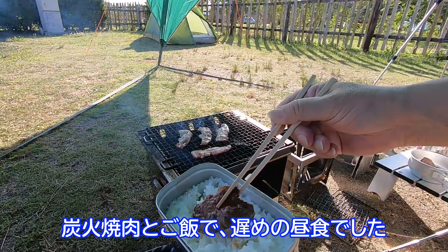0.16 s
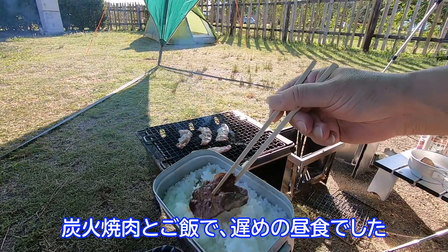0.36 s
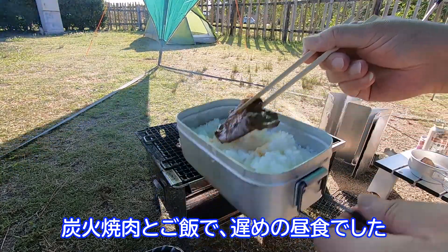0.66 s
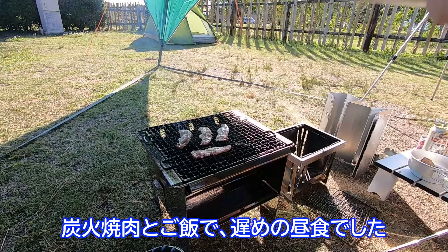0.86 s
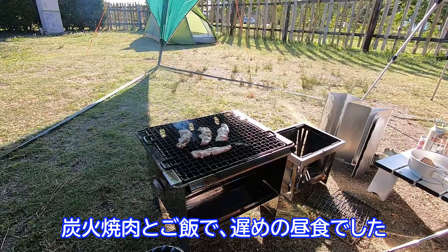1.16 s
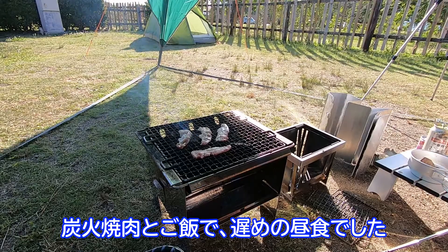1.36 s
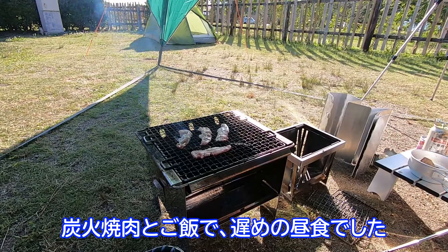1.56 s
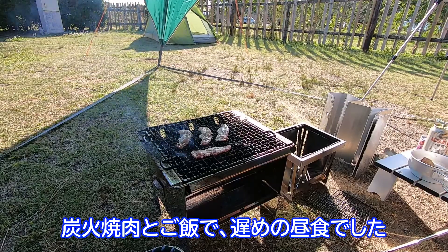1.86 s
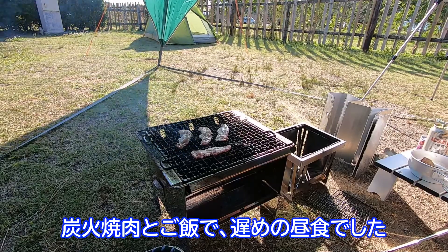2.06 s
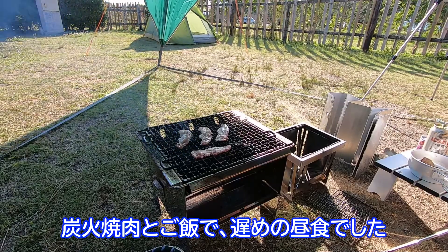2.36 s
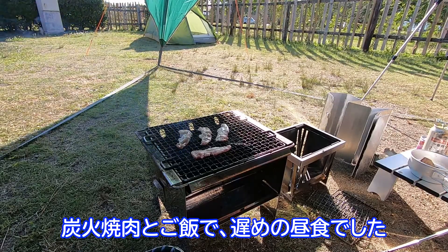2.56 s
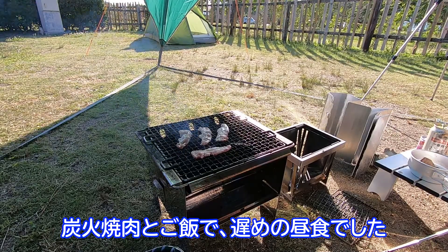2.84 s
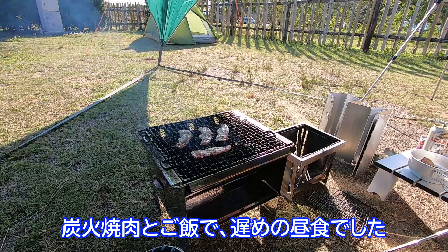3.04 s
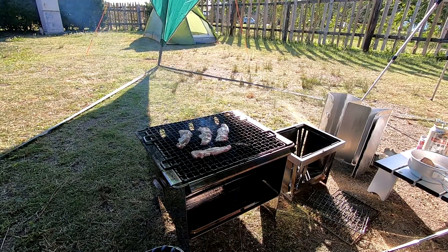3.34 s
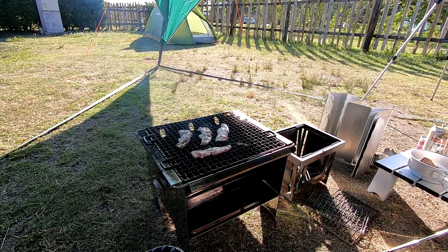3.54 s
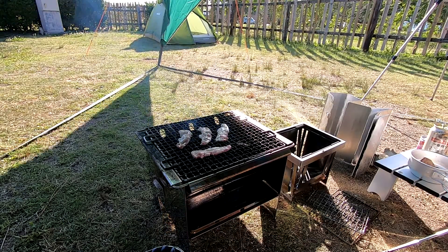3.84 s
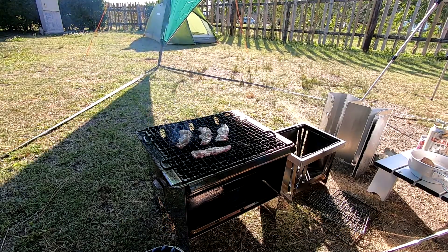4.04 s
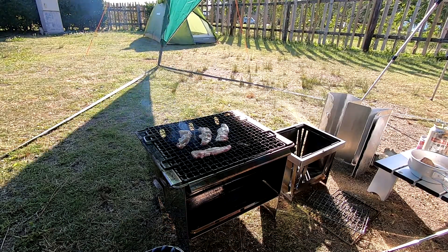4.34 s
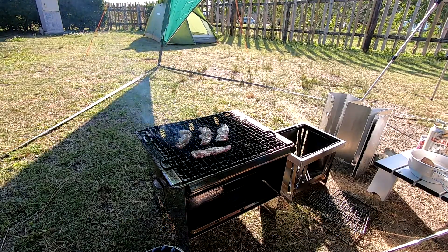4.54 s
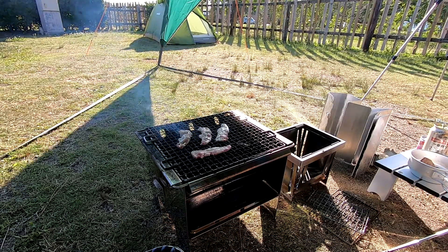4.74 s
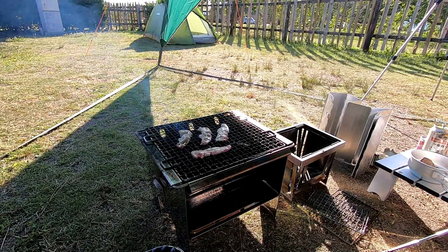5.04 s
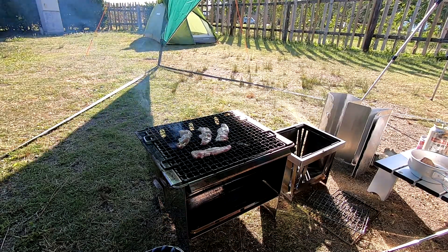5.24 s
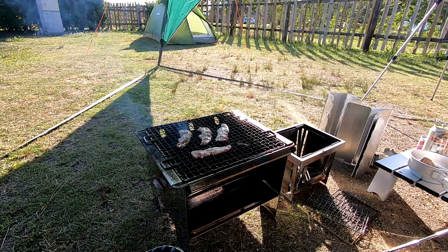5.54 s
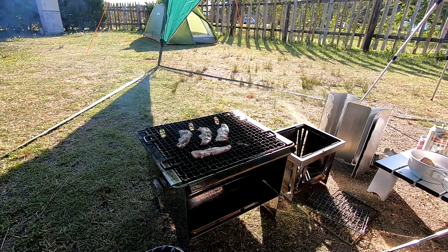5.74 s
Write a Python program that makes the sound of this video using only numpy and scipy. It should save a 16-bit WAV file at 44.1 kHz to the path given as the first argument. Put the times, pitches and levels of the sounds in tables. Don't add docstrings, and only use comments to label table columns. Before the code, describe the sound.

A bright, fine fat sizzle starts fairly strong, dotted with snaps and muted metal knocks, then eases into sparse ticking. A far engine hums low and swells around two and three seconds. Pops bunch together before four seconds; the loudest crack comes just after, followed by livelier spitting. Heard close in stereo outdoors, with short tinny grill echoes, gentle hiss, low rumble and barely noticeable wind.

```python
import sys
import numpy as np
from scipy import signal
from scipy.fft import rfft, irfft
from scipy.io import wavfile
from scipy.ndimage import uniform_filter1d

SR = 44100
rng = np.random.default_rng(int(sys.argv[2]) if len(sys.argv) > 2 else 0)


def volts_from_decibels(level):
    exponent = np.asarray(level, float) / 20
    return 10 ** exponent


def put_to_file(sound):
    columns = np.atleast_2d(sound).T
    safe = np.clip(columns, -1, 1)
    whole_steps = np.round(safe * 32767)
    wavfile.write(sys.argv[1], SR, whole_steps.astype(np.int16))


N = 260190

# (time [s], level [dB])
HEAT = [(0.0, -46), (0.16, -47.5), (0.33, -52.5), (0.56, -50.5), (1.08, -50.5), (1.56, -53), (1.81, -53),
        (2.15, -51.5), (2.33, -54), (2.55, -50), (3.27, -53), (3.63, -50.5), (3.84, -51), (4.14, -44.5),
        (4.98, -49.5), (5.16, -50), (5.6, -49.5), (5.9, -49.5)]
BUBBLE_PITCHES = [
    2850,
    3400,
    5120,
    10400,
]
# (frequency [Hz], density [dB per Hz])
BURST_COLOUR = [(290, -43), (500, -28.5), (784, -12), (1440, -15), (2260, -16.5), (2690, -10.5), (3810, -5),
                (5800, 1.5), (10400, 0), (16000, -25.5)]
# (frequency [Hz], density [dB per Hz])
STEAM_COLOUR = [(1240, -39), (2100, -26), (2730, 2), (4290, -3), (5210, 0.5), (7320, -3.5), (9210, 1.5),
                (13400, -10.5), (16000, -45)]


def fizz(per_s=800, spread_db=3.0, clump_db=3.5):
    clumps = evened(uniform_filter1d(rng.standard_normal(N), 900))
    strength = volts_from_decibels(spread_db * np.minimum(rng.exponential(1, N), 2.2))
    size = strength * (rng.random(N) < per_s * volts_from_decibels(clump_db * clumps) / SR)
    kind = rng.integers(0, 16, N)
    pitches = np.repeat(BUBBLE_PITCHES, 4) * rng.uniform(0.86, 1.67, 16)
    colour = colour_taps(BURST_COLOUR, 0.28)
    bursts = np.zeros((2, N))
    for k, hz in enumerate(pitches):
        one = bubble(signal.unit_impulse(400), hz, 0.22, 2.5, colour)
        bursts -= sides(rng.normal(0, 1.5)) * signal.oaconvolve(size * (kind == k), one)[:N]
    boxed = grill(bursts, 0.35, -4.5, 0.49, count=5)
    flicker_db = 0.13 * clumps + 2.6 * evened(uniform_filter1d(rng.standard_normal(N), 150))
    steam = noise(STEAM_COLOUR, 1.0, size=256) * volts_from_decibels(flicker_db)
    return (volts_from_decibels(-6.0) * evened(boxed) + volts_from_decibels(-3.5) * steam) * volts_from_decibels(curve(HEAT))


# (time [s], peak level [dB], bubble pitch [Hz], brightness [dB])
SNAPS = [(0.033, -31, 3320, -9), (0.16, -23, 1790, -14), (0.2919, -14, 2760, -24), (0.9265, -17, 2400, -20),
         (0.9334, -20, 3850, -3), (1.1131, -13, 3187, -11.5), (1.6063, -25, 2780, -13),
         (1.9711, -20, 2850, -4.5), (2.1526, -22, 2870, 0), (2.5866, -16.5, 4300, -4),
         (2.6615, -21.5, 3020, -8), (3.3273, -19.5, 8980, 1), (3.416, -23, 4750, -8),
         (3.636, -16, 2620, -6), (3.6493, -20, 4390, -10), (3.6889, -20, 2820, -7),
         (3.7165, -18.5, 3270, -8), (3.7933, -15, 3560, -8), (3.8069, -12.5, 2940, -6.5),
         (3.865, -25, 3240, -7), (4.1814, -3.5, 3000, -36), (4.1931, -29, 3920, 8),
         (4.2796, -22, 2850, -19), (4.6136, -15, 2820, -1), (4.6954, -21, 3020, -3), (4.819, -22, 2660, -8),
         (4.915, -17, 3600, 3), (5.131, -24, 3350, -3), (5.6907, -17, 5000, -19), (5.7201, -25, 9200, -4)]
# (time [s], peak level [dB], bubble pitch [Hz], left-right [dB])
BLIPS = [(.026, -28.5, 2030, -6), (0.0816, -29.5, 1790, -10), (0.239, -39, 2720, -13),
         (0.3753, -23.5, 10200, -24), (0.4246, -31, 5200, -2), (0.5347, -24.5, 4180, -3),
         (1.004, -32, 2690, -2), (1.1787, -37, 2770, -1), (2.1128, -28, 5300, -1), (3.4289, -33, 1620, -15),
         (3.547, -21, 8810, -3), (4.118, -20, 9900, 0), (4.188, -27, 6030, 15), (4.2358, -18, 9300, -4),
         (4.4734, -19.5, 8890, -5), (4.589, -36, 1420, -14), (4.6015, -32, 2470, 0),
         (4.924, -28.5, 2270, -13), (4.952, -20.5, 6000, -2), (4.963, -30.5, 3430, -1),
         (5.5438, -22.5, 10200, -3)]
# (time [s], peak level [dB])
LARGE = [(0.103, -30), (0.148, -26), (0.234, -28.5), (0.29, -18), (0.317, -29), (0.6045, -31), (0.716, -30),
         (1.0423, -27), (1.253, -30), (1.3399, -22), (1.3558, -32), (1.7425, -26.5), (1.946, -23.5),
         (2.008, -27), (2.3177, -24), (2.6523, -27), (2.673, -25.5), (2.706, -27), (3.29, -27),
         (3.345, -24), (3.447, -30), (3.4586, -26.5), (3.735, -21), (3.824, -30), (3.977, -29),
         (4.5554, -26), (4.732, -33), (5.0938, -24.5), (5.4524, -26)]
MIDDLE = [(.769, -31), (0.99, -23), (1.25, -28), (1.769, -26), (2.235, -26.5), (2.9487, -27), (4.056, -33),
          (4.0967, -27), (4.1117, -24), (4.267, -35), (4.625, -27), (5.3433, -37), (5.303, -43),
          (5.585, -29.5), (2.226, -39), (2.4, -37)]
SMALL = [(0.4945, -32), (0.4975, -26), (0.522, -34), (1.118, -35), (2.0793, -25.5), (2.1746, -26),
         (2.2852, -23), (2.4016, -22.5), (2.961, -21.5), (3.049, -29), (3.561, -30), (3.657, -42),
         (3.899, -24), (4.7606, -22.5), (5.0516, -23), (5.356, -39), (5.408, -34), (5.561, -36),
         (4.032, -32), (3.876, -21), (2.4046, -33), (2.381, -29)]
TINY = [(.346, -36), (2.034, -24), (2.274, -28), (2.6428, -28), (2.7615, -24), (3.265, -27), (3.273, -31),
        (3.3207, -25), (4.422, -21.5), (4.751, -21.5), (5.115, -32), (5.2045, -25.5), (5.639, -22),
        (3.5245, -38), (5.8556, -38), (2.376, -41), (2.1, -41)]
# (time [s], peak level [dB], bubble pitch [Hz])
CRACKLE_EARLY = [(0.033, -31, 3360), (0.041, -33, 2840), (0.0775, -28, 2780), (0.149, -33, 2710),
                 (0.1873, -33, 2630), (0.22, -27, 9430), (0.2396, -25, 2830), (0.309, -29, 5250),
                 (0.3789, -32, 9690), (0.392, -32, 4950), (0.5009, -29, 3450), (0.5223, -28, 5170),
                 (0.5946, -30, 6290), (0.6028, -25.5, 2710), (0.6856, -36, 2890), (0.7266, -29, 3360),
                 (0.76, -27.5, 2540), (0.8462, -40, 2710), (0.9129, -32, 3900), (1.0426, -26, 2820),
                 (1.0645, -31, 2930), (1.1185, -30, 5430), (1.2626, -27.5, 2690), (1.2707, -38, 2670),
                 (1.3127, -30, 6460), (1.3558, -32, 2760), (1.3646, -32, 5510), (1.3844, -32, 8830),
                 (1.4693, -31, 4180), (1.4991, -31, 4480), (1.5215, -28, 8830), (1.5367, -31, 5380),
                 (1.6062, -31, 2780), (1.833, -34, 3400), (1.899, -32, 3350), (1.98, -29, 8870),
                 (1.9956, -35, 3340), (2.0558, -35, 5430), (2.0825, -32, 5600), (2.1014, -44, 9000),
                 (2.109, -38, 9560), (2.1127, -36, 5170), (2.118, -34, 5250), (2.1583, -28, 2860),
                 (2.1656, -29, 8830), (2.228, -40, 3270), (2.2482, -30, 5250), (2.2801, -35, 6290),
                 (2.358, -30, 9990), (2.4361, -45, 5170), (2.453, -30, 6330), (2.4758, -30, 2870),
                 (2.5368, -27, 2700), (2.547, -31, 2610), (2.6429, -22, 8910), (2.698, -32, 2450),
                 (2.7135, -32, 2670), (2.7378, -37, 2890), (2.7667, -33, 2890), (2.7802, -44, 5040)]
CRACKLE_LATE = [(2.9833, -35, 9000), (3.031, -32, 4610), (3.0735, -30, 3750), (3.2434, -32, 9390),
                (3.2796, -27, 9390), (3.293, -31, 2840), (3.2959, -32, 2730), (3.3067, -33, 2700),
                (3.3173, -34, 6200), (3.3655, -39, 5170), (3.4984, -37, 4870), (3.524, -36, 9260),
                (3.5401, -40, 5170), (3.5452, -38, 8830), (3.5747, -32, 2410), (3.585, -35, 2630),
                (3.7349, -27, 2730), (3.7644, -33, 3230), (3.7736, -32, 2670), (3.8165, -27, 2800),
                (3.84, -41, 8910), (3.8945, -25, 6720), (3.977, -26, 2820), (4.055, -29, 3520),
                (4.096, -29, 3540), (4.2672, -23, 3070), (4.3632, -42, 3080), (4.3894, -29, 5510),
                (4.462, -28, 5000), (4.5536, -28, 2800), (4.571, -34, 10380), (4.5884, -32, 1860),
                (4.595, -24, 3190), (4.6466, -27, 3230), (4.68, -23, 9520), (4.7715, -38, 9090),
                (4.8114, -23, 2570), (4.8503, -29, 3270), (4.8766, -25, 4050), (5.006, -31, 4070),
                (5.0617, -31, 2780), (5.1115, -27, 9350), (5.1163, -31, 8610), (5.1255, -30, 4910),
                (5.147, -22, 8660), (5.2525, -33, 6500), (5.267, -36, 10550), (5.3432, -37.5, 2860),
                (5.3567, -31, 2890), (5.3766, -35, 3060), (5.4127, -32, 6030), (5.4268, -35, 3100),
                (5.4528, -30, 2630), (5.4677, -40, 3000), (5.5116, -35, 2580), (5.6444, -30, 9600),
                (5.6713, -26.5, 1880), (5.6746, -29, 9470), (5.6844, -28, 3010), (5.8106, -31, 3450)]


def burst_rows():
    rows = [(s, db, hz, 0.13, bright_db, -3) for s, db, hz, bright_db in SNAPS]
    for s, db, hz, pan_db in BLIPS:
        octaves_below = min(np.log2(hz / 6000), 0)
        rows.append((s, db, hz, 0.53, 0.5 + 4 * octaves_below, pan_db))
    for hz, ticks in zip(BUBBLE_PITCHES, (LARGE, MIDDLE, SMALL, TINY)):
        for s, db in ticks:
            ring = 0.19 - 0.03 * (db + 28.5)
            rows.append((s, db, hz, ring, -3.5, -2))
    rows += [(s, db - 0.5, hz, 0.24, -3.5, -2) for s, db, hz in CRACKLE_EARLY + CRACKLE_LATE]
    return rows


def single_bursts(colour, lead_s=0.00082, spit_ms=1.0):
    out = np.zeros((2, N))
    ms = (np.arange(500) / SR - lead_s) * 1000
    spit = np.where(ms > 0, 0.6 * np.exp(-ms / spit_ms), 0.2 * np.exp(ms / 0.45))
    rows = burst_rows()
    draws = rng.random((len(rows), 2, 500))
    for (s, db, hz, ring, bright_db, pan_db), (when, size) in zip(rows, draws):
        fuzz = np.interp(db, [-30, -15], [1.5, 0.45])
        clicks = (when < 0.09) * (2 * size - 1) * spit * fuzz
        clicks[round(lead_s * SR)] = -1
        burst = bubble(clicks, hz, np.clip(ring, 0, 1), 1.4 * (bright_db + 7.5), colour)
        add(out, s - lead_s, volts_from_decibels(db - 3.5) * sides(pan_db + 4.0) * burst / abs(burst).max())
    return out


# (time [s], length [ms], rms level [dB], bubble pitch [Hz], left-right [dB])
SPUTTERS = [(0.039, 14, -55, 2860, -3), (.076, 10.3, -48, 2800, -5), (.374, 11, -44.5, 9700, -11),
            (0.373, 3.3, -56.5, 1640, -24), (.932, 3.4, -29.5, 6000, -7), (0.996, 19, -47.5, 5130, -9),
            (1.167, 21, -59, 2900, -6), (1.062, 32, -50, 2980, -7.5), (1.132, 14, -50, 5500, -4),
            (3.565, 2.2, -56, 1350, -16), (3.655, 6.9, -42.5, 4800, -6), (3.933, 38, -49, 3800, -7),
            (4.014, 3.3, -55, 1730, -17), (4.463, 13, -48, 3600, -6), (4.591, 4.2, -47, 2970, -21),
            (4.602, 3.5, -38, 5000, -5), (4.808, 14, -50, 2880, -5), (4.9142, 15, -46, 3200, -15),
            (4.938, 5.1, -52, 2900, -2), (5.6907, 0.066, -17, 4430, -12), (4.701, 11, -64, 2180, -5),
            (4.1821, 1.07, -33, 2800, -6), (5.7198, 2.6, -31.5, 4470, -6), (1.0, 94, -62.5, 2920, -3)]
# (frequency [Hz], ring share [0-1])
SPUTTER_RING = [
    (1750, 1),
    (2800, 0.39),
    (5500, 0.11),
]


def sputters(colour):
    out = np.zeros((2, N))
    draws = rng.random((len(SPUTTERS), 2, 2400))
    for (s, length_ms, db, hz, pan_db), (when, size) in zip(SPUTTERS, draws):
        length = length_ms * SR / 1000
        clicks = (when < 0.07) * (2 * size - 1) * (np.arange(2400) < length)
        clicks[0] = -1
        burst = bubble(clicks, hz, np.clip(read(SPUTTER_RING, hz), 0, 1), 0, colour)
        add(out, s, volts_from_decibels(db) * sides(pan_db + 8.0) * burst * np.sqrt(length) / np.linalg.norm(burst))
    return out


def pops():
    colour = colour_taps(BURST_COLOUR, 0.57)
    out = single_bursts(colour) + sputters(colour)
    soft = signal.lfilter(*signal.butter(2, 9000, fs=SR), out)
    return grill(soft + volts_from_decibels(1) * (out - soft), -2.1)


def bubble(clicks, hz, ring, bright_db, colour):
    dull = signal.lfilter(*signal.butter(1, 5000, fs=SR), clicks)
    bare = dull + volts_from_decibels(bright_db) * (clicks - dull)
    width = hz / (0.78 + 2.86 * ring)
    rung = resonate(resonate(clicks, hz, width), hz, width)
    rung *= abs(clicks).max() / (abs(rung).max() + 1e-9)
    return signal.oaconvolve((1 - ring) * bare + ring * rung, colour)[32:]


# (delay [ms], left gain [ratio], right gain [ratio])
ECHOES = [(.62, 0.015, 0.33), (.75, -0.032, -0.16), (1.05, -0.27, 0.1), (1.3, 0.19, -0.04),
          (2.0, -0.43, -0.018)]
# (frequency [Hz], width [Hz], level [dB])
BOX = [
    (2690, 620, -1.5),
    (4180, 1500, -8),
    (6030, 1100, -12.5),
]
# (delay [ms], spread [ms], level [dB])
RETURNS = [
    (3.0, 3.5, -17.5),
    (7.0, 3.4, -16.5),
    (12.0, 0.53, -13),
]


def grill(x, returns_db, tail_db=-14, t60=0.18, count=1):
    taps = np.zeros((2, 4410))
    ms = np.arange(4410) * 1000 / SR
    taps[:, 0] = 1
    for delay, left, right in ECHOES:
        taps[:, round(delay * SR / 1000)] += left, right
    for hz, width, db in BOX:
        decay = np.exp(-np.pi * width * ms / 1000) * np.sqrt(4 * np.pi * width / SR)
        taps += volts_from_decibels(db) * np.sin(2 * np.pi * hz * ms / 1000) * decay
    shapes = [(db + returns_db, np.exp(-((ms - delay) / spread) ** 2)) for delay, spread, db in RETURNS]
    shapes.append((tail_db, (ms > 1) * volts_from_decibels(-60 * ms / 1000 / t60)))
    scatter = rng.standard_normal((len(shapes), *taps.shape))
    place = np.arange(N) // 256 % count
    out = 0
    for k in range(count):
        smear = 0
        for (db, shape), (a, b) in zip(shapes, np.roll(scatter, 700 * k, axis=2)):
            both = np.array([a, 1.9 * a + 0.61 * b])
            smear = smear + volts_from_decibels(db) * both * shape / np.linalg.norm(shape)
        out = out + signal.oaconvolve(x * (place == k), taps + smear, axes=1)[:, :N]
    return out


# (time [s], peak level [dB], pitch [Hz], left-right [dB])
KNOCKS = [(0.025, -32, 605, -2.5), (0.08, -30.5, 885, -4), (0.29, -34.5, 635, -4), (0.932, -28, 590, -3),
          (1.112, -29.5, 670, -2), (1.66, -37.5, 1190, -6), (1.659, -36, 634, -4), (1.731, -39.5, 614, -9),
          (1.732, -38, 1264, -6), (3.634, -35, 730, -8), (3.714, -31.5, 597, -2), (3.791, -36, 1320, -7),
          (3.803, -33.5, 550, -2.0), (3.863, -39, 1320, -2.0), (4.015, -33, 774, -8),
          (4.1805, -26, 725, -2), (4.462, -35.5, 1280, -11), (4.594, -26, 1435, -9)]


def knocks(t60=0.018):
    out = np.zeros((2, N))
    t = np.arange(3000) / SR
    for s, db, hz, pan_db in KNOCKS:
        ring = np.sin(2 * np.pi * hz * t) + 0.3 * np.sin(2 * np.pi * 2.55 * hz * t)
        onset = np.minimum(t / 0.00056, 1)
        add(out, s, volts_from_decibels(db - 2.5 - 60 * t / t60) * onset * ring * sides(pan_db))
    return out


# (time [s], level [dB])
DRONE = [(0.0, -45), (0.74, -59), (0.79, -46), (2.0, -51), (2.14, -37), (2.2, -54), (2.36, -36),
         (2.55, -53), (2.6, -47), (2.84, -35.5), (2.89, -70), (3.11, -39.5), (5.16, -53), (5.23, -40),
         (5.39, -66), (5.49, -45), (5.8, -57), (5.9, -44)]
# (frequency [Hz], width [Hz], level [dB])
OVERTONES = [(101, 11, -61), (130, 14.3, -53), (170.8, 17.6, -58), (204.1, 9.9, -60), (254.4, 21.6, -64.5)]


def drone():
    hz = np.linspace(56, 62, N) + 1.653 * evened(uniform_filter1d(rng.standard_normal(N), 8000))
    waver_db = 1.2 * evened(uniform_filter1d(rng.standard_normal(N), 5000))
    out = volts_from_decibels(curve(DRONE) + 1.0 + waver_db) * np.sin(2 * np.pi * np.cumsum(hz) / SR)
    for line_hz, width, db in OVERTONES:
        line = resonate(resonate(rng.standard_normal(N), line_hz, width), line_hz, width)
        out = out + volts_from_decibels(db) * evened(line)
    return out


# (time [s], level [dB])
RUMBLE = [(0.0, -39.5), (0.25, -44), (1.07, -41.5), (1.12, -43.5), (2.23, -42.5), (5.9, -45)]
# (frequency [Hz], density [dB per Hz])
RUMBLE_COLOUR = [(12, -38), (24, -7), (43, -4), (65, -1), (82, 0.5), (129, -2), (178, -4), (250, -9.5),
                 (297, -16.5), (450, -30.5), (580, -78), (990, -120)]


def rumble():
    return noise(RUMBLE_COLOUR, 1.77, size=4096) * volts_from_decibels(curve(RUMBLE) + 0.8)


# (time [s], level [dB])
HISS = [(0.0, -52), (0.34, -57.5), (3.43, -59), (4.04, -57), (4.67, -57), (5.39, -58.5), (5.9, -56.5)]
# (frequency [Hz], density [dB per Hz])
HISS_COLOUR = [(180, -11), (300, -3.5), (518, -8), (841, -7), (964, -10.5), (1310, -6.5), (2300, -14.5),
               (2990, -51), (5060, -120)]


def hiss():
    return noise(HISS_COLOUR, 2.35, size=512) * volts_from_decibels(curve(HISS) + 3.0)


def wind():
    lumps = volts_from_decibels(6.5 * evened(uniform_filter1d(rng.standard_normal((2, N)), 9000)))
    deep = signal.butter(2, [20, 75], "band", fs=SR, output="sos")
    air = signal.sosfilt(deep, rng.standard_normal((2, N)))
    return volts_from_decibels(-59.5) * evened(air * lumps)


# (frequency [Hz], correlation [-1 to 1])
SAME = [(60, 1), (130, 1), (290, 0.88), (640, 0.011), (1410, 0.023), (3100, 1), (6820, 0.33),
        (15000, 0.049)]


def noise(colour, patchy_db, size):
    frames, hz = 4 * N // size + 5, np.fft.rfftfreq(size, 1 / SR)
    a, b, c, d, patches = rng.standard_normal((frames, len(hz), 5)).T
    patches = evened(uniform_filter1d(uniform_filter1d(patches, 10, 0), 10, 1))
    same = np.clip(read(SAME, hz), -1, 1)[:, None]
    left = a + 1j * b
    right = same * left + np.sqrt(1 - same ** 2) * (c + 1j * d)
    spectra = np.array([left, right]) * volts_from_decibels(read(colour, hz)[:, None] + patchy_db * patches)
    return evened(signal.istft(spectra, nperseg=size, noverlap=3 * size // 4)[1][:, :N])


def resonate(x, hz, width):
    turn = np.exp(2j * np.pi * np.cumsum(hz * np.ones(len(x))) / SR)
    r = np.exp(-np.pi * width / SR)
    return 2 * (turn * signal.lfilter([1 - r], [1, -r], x / turn + 1e-18)).real


def colour_taps(points, share, size=1024):
    gain_db = read(points, abs(np.fft.fftfreq(size, 1 / SR)))
    log_gain = np.log(volts_from_decibels(np.maximum(gain_db, -100)))
    phase = share * signal.hilbert(log_gain).imag
    taps = np.roll(np.fft.ifft(np.exp(log_gain - 1j * phase)).real, 32)
    return taps[:size // 2] / abs(taps).max()


def evened(x):
    return x / np.sqrt(np.mean(x ** 2) + 1e-20)


def read(points, hz):
    f, value = np.transpose(points)
    return np.interp(np.log(hz + 1), np.log(f + 1), value)


def curve(rows):
    s, level_db = np.transpose(rows)
    return np.interp(np.arange(N) / SR, s, level_db)


def add(mix, s, sound):
    part = mix[:, max(round(s * SR), 0):][:, :sound.shape[1]]
    part += sound[:, :part.shape[1]]


def sides(pan_db):
    return volts_from_decibels(np.array([[pan_db / 2], [-pan_db / 2]]))


def scene():
    return fizz() + pops() + knocks() + drone() + rumble() + hiss() + wind()


def band_limit(x):
    return signal.sosfilt(signal.butter(12, 15700, fs=SR, output="sos"), x)


# (frequency [Hz], left-right [dB])
LEAN = [(60, -1), (240, -0.5), (950, -0.5), (3770, -0.7), (10000, -1.5), (13500, 1.5)]


def record(dry):
    hz = np.fft.rfftfreq(N, 1 / SR)
    phase = np.pi * hz * 1.4e-5 + 19 / (hz + 12)
    ports = volts_from_decibels(read(LEAN, hz) / 2) * np.exp(1j * phase)
    step_db = np.interp(hz, [10600, 11040, 14700, 15600, 16000], [0.0, -3.5, 1.0, -3.0, -14])
    shaped = irfft(rfft(dry) * np.array([ports, 1 / ports]) * volts_from_decibels(step_db), N)
    return band_limit(shaped)


dry = scene()
out = record(dry)
put_to_file(out)
```